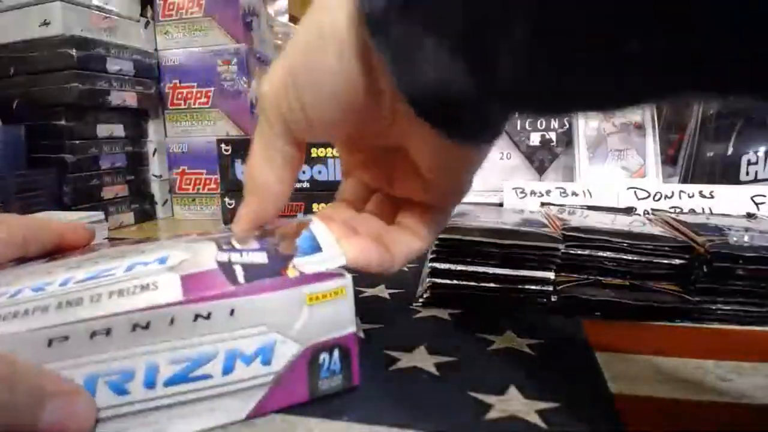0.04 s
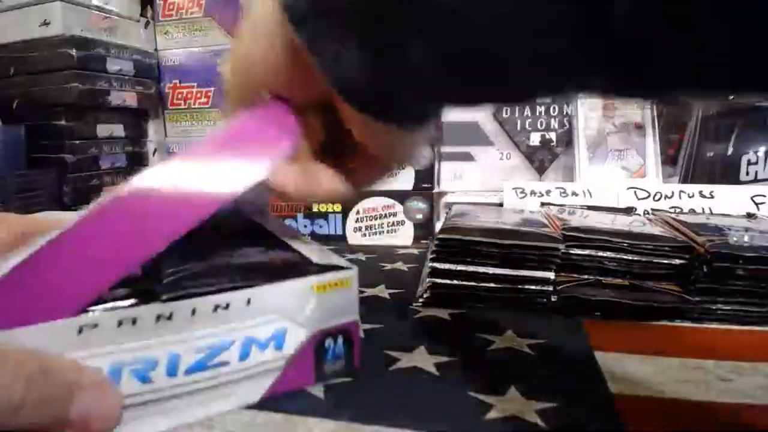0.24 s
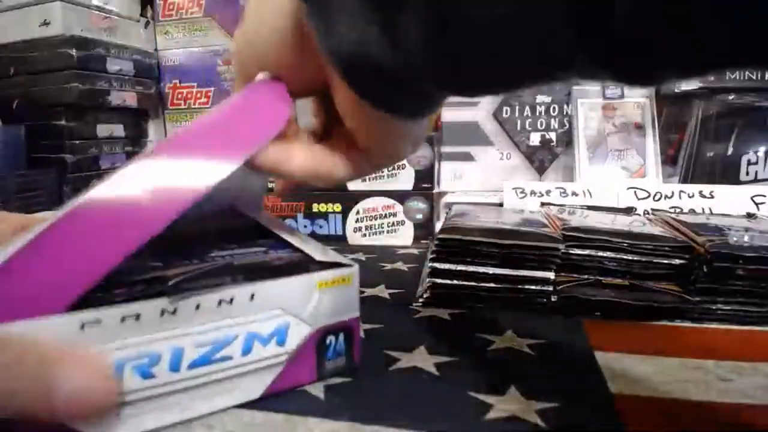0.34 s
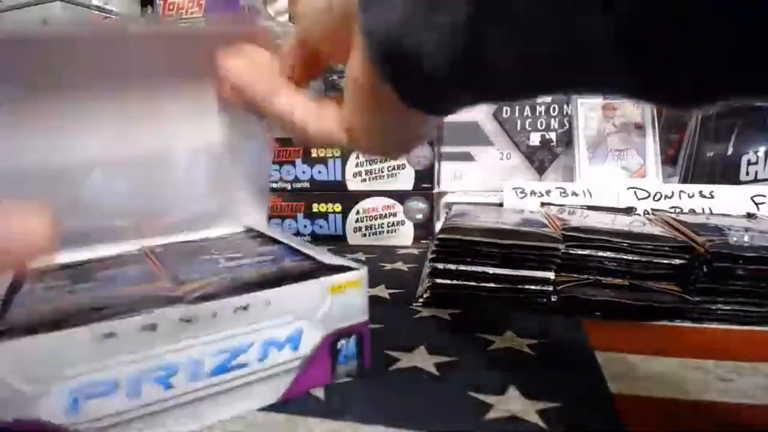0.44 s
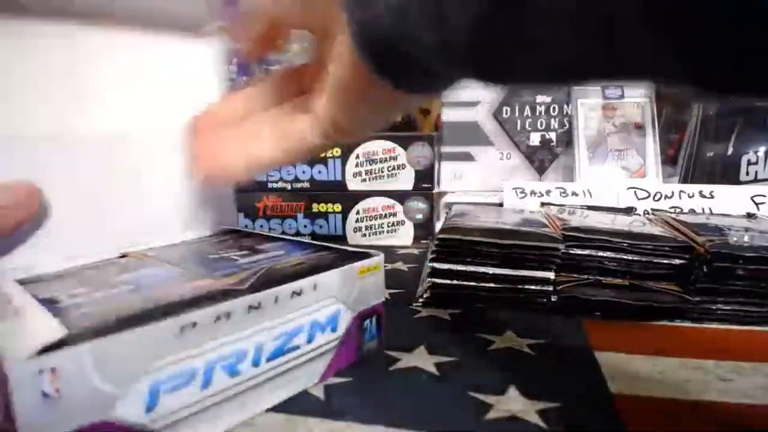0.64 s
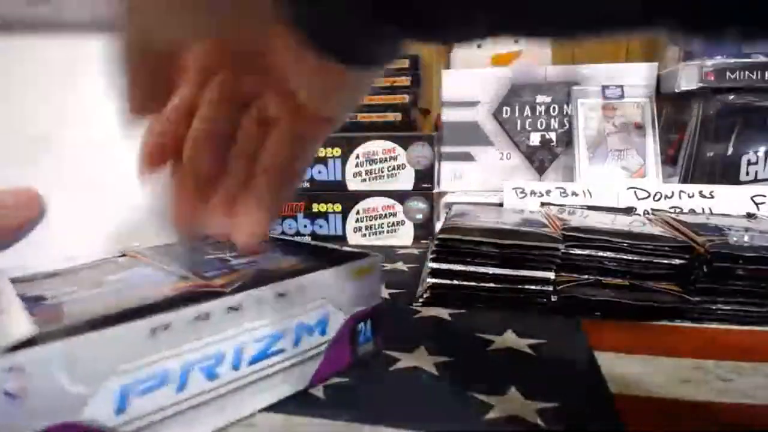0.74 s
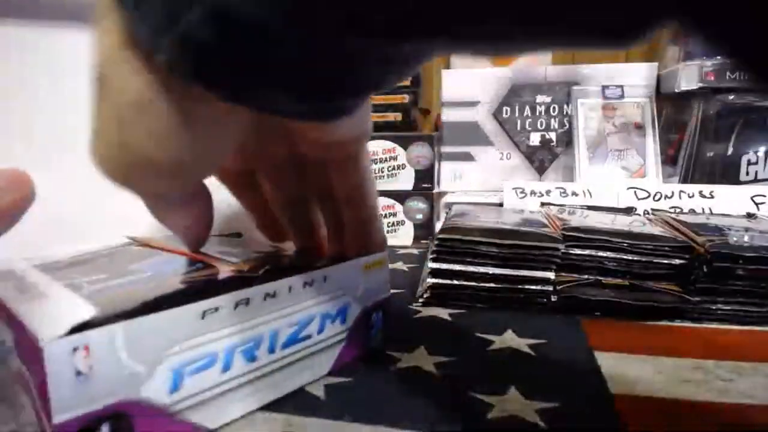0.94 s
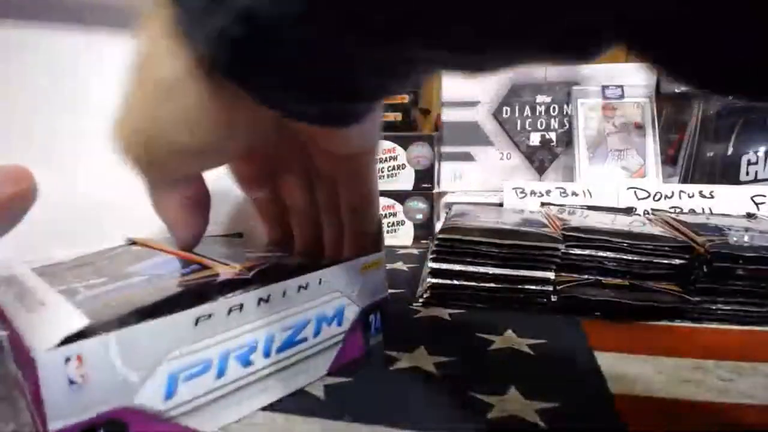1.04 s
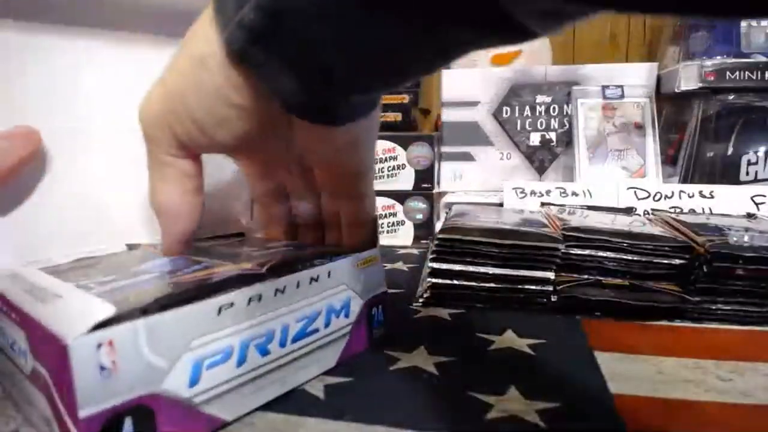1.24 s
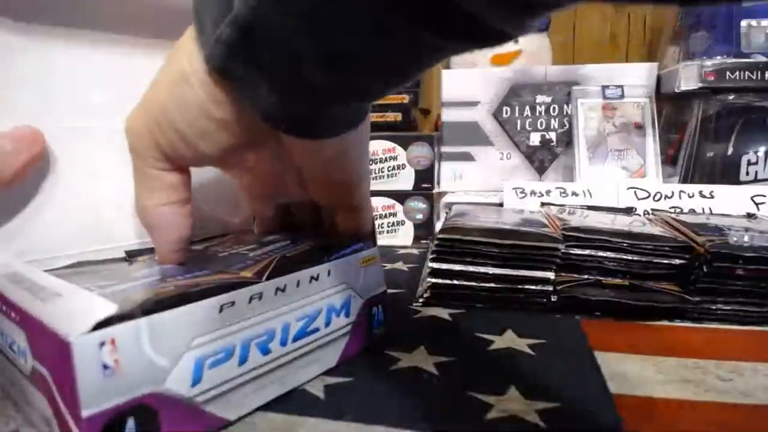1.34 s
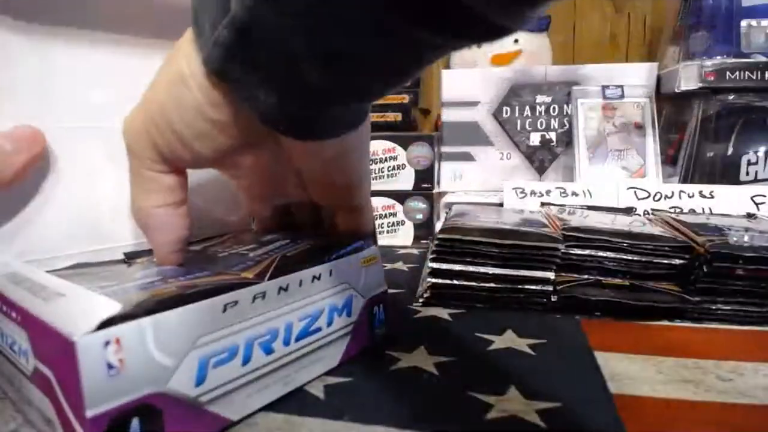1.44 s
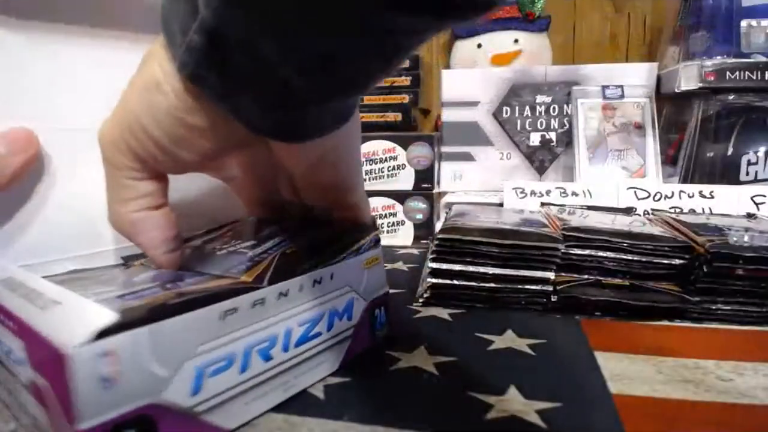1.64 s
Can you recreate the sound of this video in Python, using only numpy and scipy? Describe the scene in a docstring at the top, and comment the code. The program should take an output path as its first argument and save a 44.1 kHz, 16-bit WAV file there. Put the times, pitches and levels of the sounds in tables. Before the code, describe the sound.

A cardboard box is torn open close to the microphone in a small, dry room. The lid creaks, rips and slaps back, then fingers shuffle the foil packs inside with clicks and scrapes.

```python
"""A cardboard box is torn open on a table, close to the microphone in a small, dry room.
First the strained lid creaks. At 0.2 s it rips along its perforation and snaps free, then it
slaps back at 0.46 s and the box bumps on the table. From 0.8 s fingers flick and knock the foil
packs inside, which click, squeak and slide against each other and the card walls.
At 1.3 s one pack chatters as it is wedged in, and a few more scrapes end the scene."""
import sys
import numpy as np
from scipy import signal
from scipy.fft import rfft, irfft
from scipy.io import wavfile
from scipy.ndimage import uniform_filter1d

SR = 44100
rng = np.random.default_rng(int(sys.argv[2]) if len(sys.argv) > 2 else 0)


def master_out(mix):
    """Clip the mix to full scale and print it as 16-bit PCM to the path in sys.argv[1]."""
    frames = np.transpose(np.atleast_2d(mix))
    ceiling = np.clip(frames, -1, 1)
    pcm = np.round(ceiling * 32767).astype(np.int16)
    wavfile.write(sys.argv[1], SR, pcm)


N = 74970
T = np.arange(N) / SR


def amp(db):
    """Turn decibels into a gain."""
    return 10 ** (np.asarray(db) / 20)


def unit(x):
    """Scale to an average strength (rms) of 1."""
    return x / np.sqrt(np.mean(x ** 2) + 1e-20)


def colour(x, points):
    """Shape the tone along a curve of (f/Hz, level/dB) points; white noise keeps its power."""
    hz, db = np.array(points).T
    size = 2 * N
    curve_db = np.interp(np.log(np.fft.rfftfreq(size, 1 / SR) + 1), np.log(hz), db)
    cepstrum = irfft(np.log(unit(amp(curve_db))))
    # fold the filter so that it never sounds ahead of a click
    cepstrum[1:N] *= 2
    cepstrum[N + 1:] = 0
    return irfft(rfft(x, size) * np.exp(rfft(cepstrum)))[:N]


def cut(x, hz, kind, order=2):
    """Keep the "low" or the "high" side of a frequency."""
    return signal.sosfilt(signal.butter(order, min(hz, SR / 2 - 1), kind, fs=SR, output="sos"), x + 1e-18)


def late(x, start_s):
    """The same sound, starting later."""
    return np.concatenate([np.zeros(max(int(start_s * SR), 0)), x])[:N]


def grains(per_s, scatter_db):
    """Tiny clicks at random moments and of uneven size."""
    size = amp(scatter_db * np.clip(rng.standard_normal(N), -2, 2)) * rng.choice([-1, 1], N)
    return unit(size * (rng.random(N) < per_s / SR))


def ring(tones):
    """A struck panel rings: tones of alternating sign, each dying by 60 dB in its fade time."""
    return sum((-1) ** k * amp(db) * np.sin(2 * np.pi * hz * T) * np.exp(-np.log(1000) * T / fade_s)
               for k, (hz, db, fade_s) in enumerate(tones))


def burst(points, decay_s):
    """A brief crush of noise with a sharp start."""
    return colour(rng.choice([-1., 1.], N) * np.exp(-T / decay_s), points)


def swell(length_s):
    """One smooth rise and fall."""
    return np.sin(np.pi * np.minimum(T / length_s, 1))


# tone of the background hiss: f/Hz, level/dB
HISS_TONE = [(30, -4.5), (100, 0.5), (400, -2), (1200, -9.5), (4000, -19.5), (10000, -16.5), (15500, -32.5)]

def hiss():
    """A faint, steady noise lies under everything."""
    return amp(-77) * colour(rng.standard_normal(N), HISS_TONE)


# tone of the room's echo: f/Hz, level/dB
ROOM_TONE = [(60, -26.5), (300, -3), (600, 0.5), (1500, -5), (7000, -0.5), (15000, -8.5)]

def room_echo(direct, fade_s=0.16, delay_s=0.006, level_db=-23.5):
    """The nearby walls send back a short, soft echo."""
    reflections = rng.standard_normal(N) * np.exp(-np.log(1000) * T / fade_s)
    tail = late(colour(reflections, ROOM_TONE), delay_s)
    return amp(level_db) * signal.fftconvolve(direct, unit(tail) / np.sqrt(N))[:N]


# the foil crinkles: t/s, length/s, level/dB
CRINKLES = [(0.473, 0.058, -53.5), (0.861, 0.017, -59.5), (1.106, 0.096, -65), (1.363, 0.05, -59),
            (1.432, 0.041, -49)]
# tone of its creases: f/Hz, level/dB
CREASE_TONE = [(2000, -16), (6000, -3), (7800, -1.5), (9500, 3), (11000, -6), (12500, -11), (15500, -19)]

def foil_crinkles():
    """Thin foil gives under the fingers in swells of tiny, bright creases."""
    out = np.zeros(N)
    for start, length, db in CRINKLES:
        creases = grains(per_s=4700, scatter_db=5) * swell(length)
        out += late(amp(db) * colour(creases, CREASE_TONE), start)
    return out


# the foil squeaks: t/s, length/s, f/Hz, level/dB
SQUEAKS = [(1.014, .016, 4750, -53), (1.04, .055, 3300, -56), (1.07, .04, 4450, -56)]

def foil_squeaks(wander=0.035):
    """Foil rubbing on foil sings briefly at an unsteady pitch."""
    out = np.zeros(N)
    for start, length, hz, db in SQUEAKS:
        wobble = unit(cut(rng.standard_normal(N), 600, "low"))
        phase = 2 * np.pi * np.cumsum(hz * (1 + wander * wobble)) / SR
        out += late(amp(db) * np.sin(phase) * swell(length), start)
    return out


# a card edge drags: t/s, length/s, first f/Hz, last f/Hz, width/Hz, level/dB
DRAGS = [(.512, 0.0079, 1553, 1450, 200, -30.5), (1.504, 0.092, 1185, 1689, 376, -47.5),
         (1.51, 0.055, 699, 898, 353, -47), (1.668, 0.051, 1737, 2170, 450, -51),
         (1.687, .026, 860, 900, 252, -48.5)]

def card_drags():
    """Rubbing makes a narrow band of noise whose pitch glides as the card moves."""
    out = np.zeros(N)
    for start, length, from_hz, to_hz, width_hz, db in DRAGS:
        pitch = from_hz + (to_hz - from_hz) * np.minimum(T / length, 1)
        phase = 2 * np.pi * np.cumsum(pitch) / SR
        rough = [unit(cut(rng.standard_normal(N), width_hz / 2, "low", order=3)) for _ in range(2)]
        band = rough[0] * np.cos(phase) + rough[1] * np.sin(phase)
        out += late(amp(db) * band * swell(length), start)
    return out


# ringing of the tight pack: f/Hz, level/dB, fade/s
PACK_RING = [(976, -5, 0.017), (1184, 3, 0.031), (1504, -2, 0.023), (2150, -4, 0.013), (2610, -14.5, 0.013),
             (3450, -3.5, 0.015), (4280, -6, 0.011), (5410, -9, 0.022), (6100, -19, 0.011),
             (6980, -11.5, .013)]

def wedged_pack(start_s=1.302, length_s=0.033, edge_s=0.0035, level_db=-30):
    """Fast, uneven slips make one pack chatter as it is wedged in."""
    press = np.clip(np.minimum(T, length_s + edge_s - T) / edge_s, 0, 1)
    stall = 1 - np.exp(-((T - 0.012) / 0.0022) ** 2)  # it sticks once, 12 ms in
    slips = grains(per_s=2500, scatter_db=1.5) * press * stall
    pack = unit(cut(ring(PACK_RING), PACK_RING[0][0], "high")) / np.sqrt(N)
    return late(amp(level_db) * signal.fftconvolve(slips, pack)[:N], start_s)


# card and packs slide: t/s, length/s, rise/s, fall/s, hum level/dB, low f/Hz, high f/Hz, scratch level/dB
SLIDES = [(0.141, 0.053, .004, 0.015, -57.5, 590, 1230, -89),
          (0.27, 0.25, 0.0091, 0.025, -53.5, 867, 2120, -65.5),
          (0.278, 0.034, 0.0046, 0.038, -55.5, 173.7, 450, -81),
          (0.384, 0.036, 0.024, 0.013, -58, 152, 586, -78),
          (0.34, 0.059, 0.014, 0.01, -48, 1150, 2000, -62),
          (0.399, 0.085, 0.02, 0.0045, -36.5, 1150, 1950, -51),
          (0.425, 0.046, 0.062, 0.0039, -35, 300, 2470, -38.5),
          (0.469, 0.026, 0.0028, 0.022, -46.5, 397, 1390, -53),
          (0.506, 0.012, 0.0032, 0.0024, -41.5, 510, 1660, -46.5),
          (0.517, 0.082, .005, 0.025, -59, 398, 2290, -64),
          (0.668, 0.046, 0.0047, 0.028, -59, 343.5, 1300, -69.5),
          (.727, 0.0088, 0.0036, 0.0035, -59.5, 1253, 1500, -80),
          (0.912, 0.044, 0.043, 0.0069, -50, 397, 1350, -53.5),
          (0.921, 0.054, 0.025, 0.012, -53.5, 160, 496, -86),
          (0.946, 0.051, 0.0023, 0.0039, -46, 380, 1140, -61),
          (1.001, 0.11, 0.018, 0.028, -50.5, 520, 1390, -57),
          (1.071, 0.046, 0.0088, 0.015, -52.5, 196, 756, -83),
          (1.13, 0.026, 0.021, 0.0087, -54, 540, 1700, -65),
          (1.164, 0.013, 0.0012, 0.0083, -49.5, 490, 1510, -59.5),
          (1.173, 0.047, 0.012, 0.021, -33, 430, 1250, -58),
          (1.228, 0.013, 0.0032, 0.0093, -39.5, 617, 2000, -62),
          (1.267, 0.013, 0.0059, 0.011, -42.5, 1050, 2120, -62),
          (1.301, 0.036, 0.006, 0.0027, -38.5, 920, 1850, -41.5),
          (1.337, 0.057, 0.0028, 0.0049, -44, 620, 1740, -57.5),
          (1.38, 0.038, 0.013, 0.0051, -37, 550, 1890, -50.5),
          (1.42, 0.046, 0.0071, 0.018, -30.5, 467, 1480, -41),
          (1.496, 0.072, 0.015, 0.025, -46.5, 533, 1314, -69.5),
          (1.608, 0.0052, 0.0022, 0.0083, -50.5, 700, 1400, -86.5),
          (1.663, 0.032, .003, .009, -52.5, 1150, 1700, -75),
          (1.664, 0.03, 0.0053, 0.0092, -65.5, 79.7, 804, -77)]
# comb-like colour the nearby table lends the rubbing: f/Hz, level/dB
HOLLOW_TONE = [(300, 2), (450, -2.5), (560, 4), (660, 2.5), (830, 2), (980, -2.5), (1200, -1), (1330, 0.5),
               (1520, -1), (1800, -1.5), (2150, -3.5), (3000, -4)]
# tone of scratching foil: f/Hz, level/dB
SCRATCH_TONE = [(200, -47), (600, -23), (1800, -2.5), (2600, 3), (3000, 1), (3600, 3.5), (4700, -6),
                (5600, -4), (7100, -8), (7900, -13.5), (9500, -8.5), (11500, -19), (12500, -26.5),
                (15500, -31)]

def slides(judder_db=2, judder_s=0.0032):
    """Surfaces catch and let go in a shaky stream: the card hums, the foil scratches above it."""
    out = np.zeros(N)
    for start, length, rise, fall, hum_db, low_hz, high_hz, scratch_db in SLIDES:
        judder = unit(uniform_filter1d(rng.standard_normal(N), int(judder_s * SR)))
        catches = unit(grains(per_s=4000, scatter_db=4.5) * amp(judder_db * judder))
        hum = cut(colour(catches, HOLLOW_TONE), low_hz, "high", order=4)
        hum = unit(cut(hum, high_hz, "low", order=5))
        scratch = colour(catches, SCRATCH_TONE)
        pressure = np.minimum(T / rise, 1) * np.exp(-np.maximum(T - length, 0) / fall)
        out += late(pressure * (amp(hum_db) * hum + amp(scratch_db) * scratch), start)
    return out


# the packs click and fingers tap them: t/s, level/dB, lowest f/Hz, decay/s
CLICKS = [(.035, -48, 2470, 0.0019), (0.364, -30, 1840, 0.0018), (.511, -33, 695, 0.0036),
          (0.567, -41, 1190, 0.0034), (.587, -38.5, 1180, 0.0042), (.678, -49, 505, 0.0089),
          (0.8017, -35, 1760, 0.0036), (0.815, -50, 1690, 0.014), (0.867, -44.5, 2410, 0.011),
          (0.887, -41, 700, 0.0081), (0.8942, -26, 1100, 0.00081), (.8958, -30.5, 895, 0.0008),
          (.901, -31, 3500, 0.00083), (0.9306, -42, 1800, 0.001), (0.95, -33.5, 1500, 0.00068),
          (0.9894, -30, 1510, 0.0014), (.9926, -26.5, 716, 0.0014), (1.0169, -38, 720, 0.0026),
          (1.1119, -49, 2190, .0015), (1.1614, -34.5, 503, 0.0018), (1.387, -31.5, 700, 0.002),
          (1.4057, -32, 1500, .003), (1.4114, -26.5, 900, .002), (1.4309, -19, 900, 0.00079),
          (1.434, -16.5, 600, 0.00049), (1.4445, -25.5, 700, 0.0014), (1.4498, -19, 800, 0.00044),
          (1.4625, -31, 700, 0.0011), (1.4665, -29, 1000, .0015), (1.4887, -28.5, 1000, 0.00084)]
# tone of buckling foil: f/Hz, level/dB
FOIL_TONE = [(300, 8.5), (1000, 11), (1500, -0.5), (2350, 3.5), (3000, -4.5), (3600, -4.5), (4600, -12.5),
             (6300, -4.5), (7100, -13), (7900, -15), (9800, -11), (12500, -25.5), (15500, -30.5)]

def foil_clicks():
    """Foil buckles in single clicks, and fingertips tap the packs the same way; smaller creases sound thinner."""
    return sum(late(cut(amp(db) * burst(FOIL_TONE, decay_s), low_hz, "high"), start)
               for start, db, low_hz, decay_s in CLICKS)


# a pack is flicked: t/s, level/dB
FLICKS = [(.8012, -39), (.816, -51.5), (0.8678, -58)]
# ringing of its wrapper: f/Hz, level/dB, fade/s
WRAPPER_RING = [(794, -7, 0.047), (1050, -12.5, 0.12), (1906, -0.5, 0.036), (2220, 3, 0.021),
                (2500, 4, 0.022), (3280, -10, 0.043), (7030, -5.5, 0.029)]

def pack_flicks():
    """A finger flicks a pack and its stiff wrapper rings."""
    return sum(late(amp(db) * ring(WRAPPER_RING), start) for start, db in FLICKS)


# low thuds as the lid tears, and as box and hand bump the table: t/s, f/Hz, level/dB, time to peak/s
BUMPS = [(0.199, 202, -39, 0.0029), (0.2096, 760, -24, 0.00037), (.209, 322, -33.5, 0.0023),
         (0.23, 182, -19, 0.0036), (0.236, 440, -14, 0.00083), (0.2456, 290, -20.5, 0.00078),
         (0.256, 202, -27, 0.0023), (0.28, 223, -40.5, 0.0037), (.4695, 270, -15.5, 0.00088),
         (.4865, 560, -31, 0.0018), (0.491, 85, -43, 0.0058), (.511, 671, -27, 0.0021),
         (0.541, 230, -40, 0.003), (0.57, 229, -30.5, 0.0015), (.585, 95, -53, 0.0074),
         (0.676, 474, -42, 0.0028), (0.677, 118.3, -30, 0.0062), (.689, 145.7, -26.5, 0.0073),
         (0.7, 194, -34.5, 0.0018), (.724, 110.4, -45, 0.008), (0.765, 154, -40, 0.011),
         (0.766, 245, -34.5, 0.004), (.794, 162.2, -35, 0.0039), (.864, 276, -53.5, 0.0033)]

def table_bumps():
    """Each soft contact gives a few slow swings, heard as a dull thud."""
    out = np.zeros(N)
    for start, hz, db, peak_s in BUMPS:
        push = T / peak_s * np.exp(1 - T / peak_s)
        out += late(-amp(db) * np.sin(2 * np.pi * hz * T) * push, start)
    return out


# tone of the crack that starts a hit: f/Hz, level/dB
CRACK_TONE = [(100, -30), (500, 11), (1200, 6), (2500, -2), (4200, -15.5), (7000, -13), (8200, -15),
              (10500, -27), (15500, -44)]

def hit(tones, ring_db, crack_db, build_s):
    """A crack, then a short hollow ring that builds as the surface is pushed in."""
    ringing = ring(tones) * (1 - np.exp(-T / build_s))
    return amp(ring_db) * ringing + amp(crack_db) * burst(CRACK_TONE, decay_s=0.0038)


# ringing of the stack of packs: f/Hz, level/dB, fade/s
STACK_RING = [(143, -25, 0.019), (274, -0.5, 0.039), (651, -1.5, 0.027), (1024, -7.5, 0.023),
              (1265, 2, 0.021), (1787, -7.5, 0.022), (2156, -12, 0.023), (2774, -9.5, 0.018),
              (3200, -5, 0.013), (4200, -16, 0.022)]

def finger_knock():
    """Fingers knock on the stack of packs and set it ringing; their quick further contacts sound among the
    clicks."""
    return late(hit(STACK_RING, ring_db=-21, crack_db=-34.5, build_s=0.0016), start_s=0.8942)


# ringing of the box: f/Hz, level/dB, fade/s
BOX_RING = [(113.6, -6, 0.057), (268.5, -0.5, 0.041), (441, -1.5, 0.037), (611, 1.5, 0.027),
            (893, -1.5, 0.017), (1128, 4.5, 0.02), (1512, -8, 0.0358), (2040, -7, 0.024),
            (2443, -3.5, 0.021), (3423, -6.5, 0.015), (3760, -10.5, 0.012), (5710, -14.5, 0.018),
            (6980, -14, 0.021)]

def lid_slap():
    """The lid slaps back and sets the box ringing."""
    return late(hit(BOX_RING, ring_db=-9.5, crack_db=-9, build_s=0.00093), start_s=0.4638)


# the lid slips in jerks: t/s, level/dB, f/Hz, build-up/s
SLIPS = [(0.0686, -42.5, 950, 0.0015), (.077, -27.5, 860, 0.0017), (0.0853, -23, 835, 0.0026),
         (0.094, -29, 990, 0.00026), (0.1034, -28.5, 940, 0.00042), (0.1136, -27.5, 960, 0.00026),
         (.122, -27.5, 810, 0.00069), (0.1254, -28, 693, 0.000092), (.135, -27.5, 965, 0.00024)]
# other tones of the bending lid: f/Hz, level/dB, fade/s
BEND_RING = [(240, -21.5, 0.035), (543, -10.5, 0.032), (1562, -11.5, .018), (1900, -15, 0.013),
             (2494, -9.5, 0.016), (3770, -27, 0.014), (4420, -33.5, .014), (5110, -37.5, .014)]

def lid_creak(fade_s=0.028, shudder_s=0.0048, shudder_db=-22):
    """The strained lid sticks and slips; each slip shudders and rings the card at its own pitch."""
    out = np.zeros(N)
    for start, db, hz, build_s in SLIPS:
        push = amp(shudder_db) * grains(per_s=830, scatter_db=1.8) * np.exp(-T / shudder_s)
        push[0] += 1  # the jerk itself
        card = ring([(hz, 0, fade_s)] + BEND_RING) * (1 - np.exp(-T / build_s))
        out += late(amp(db) * signal.fftconvolve(push, card)[:N], start)
    return cut(out, 5200, "low", order=4)


# loudness of the rip as it runs: t/s, level/dB
RIP_LEVELS = [(0.201, -69), (0.211, -56), (0.219, -51), (0.221, -33.5), (0.227, -41), (0.232, -20.5),
              (.238, -22), (.239, -13), (0.244, -21.5), (0.248, -30.5), (.262, -26.5), (0.267, -39),
              (0.279, -51.5), (.3, -75)]
# tone of snapping fibres: f/Hz, level/dB
FIBRE_TONE = [(50, -35.5), (125, -10), (165, -8.5), (240, -6), (370, -12), (470, -4.5), (525, 2),
              (590, -11.5), (690, -13.5), (790, -4), (1050, 0), (1200, -5), (1380, -7), (1650, -11),
              (2300, -6.5), (3800, -23.5), (4700, -19), (7000, -18.5), (7800, -26), (10000, -24),
              (15500, -39)]

def lid_rip():
    """The perforation gives way as fibres snap in a dense run."""
    times, db = np.array(RIP_LEVELS).T
    effort = amp(np.interp(T, times, db)) * (T > times[0]) * (T < times[-1])
    return colour(grains(per_s=3200, scatter_db=5) * effort, FIBRE_TONE)


# the last tabs snap: t/s, ring level/dB, crack level/dB
SNAPS = [(.2212, -37.5, -31.5), (.2315, -23, -21), (.2345, -35, -18.5), (.2391, -13, -4.5),
         (.2458, -29, -17), (.2572, -29, -25.5), (.261, -30, -27.5)]
# tone of a breaking tab: f/Hz, level/dB
SNAP_TONE = [(100, -12), (600, 3), (1200, 1.5), (3500, -15), (7000, -11), (7700, -30.5), (8600, -19),
             (10000, -14), (15500, -26.5)]
# ringing of the freed lid: f/Hz, level/dB, fade/s
LID_RING = [(140, -3, .045), (270, -11, .035), (524, -1, .05), (820, -1, .02), (1050, -3, .03),
            (1384, -9, .06), (1564, -14, .065), (1771, -15, .07), (1961, -12, .07), (2360, -9, .03),
            (4630, -17, .03), (5122, -21, .03), (7000, -20, .03)]

def tab_snaps():
    """Each tab breaks with a crack and rings the lid as it comes free."""
    lid = ring(LID_RING)
    return sum(late(amp(ring_db) * lid + amp(crack_db) * burst(SNAP_TONE, decay_s=0.0015), start)
               for start, ring_db, crack_db in SNAPS)


def scene():
    """The box and its packs, the room's echo and the hiss, in one channel."""
    lid = lid_creak() + lid_rip() + tab_snaps() + lid_slap()
    taps = finger_knock() + pack_flicks() + table_bumps() + foil_clicks()
    rubbing = slides() + card_drags() + foil_squeaks() + foil_crinkles() + wedged_pack()
    direct = lid + taps + rubbing
    return (direct + room_echo(direct) + hiss())[None]


def record(dry, ceiling=1.6, bass_hz=65, top_hz=15900):
    """The microphone rounds the highest peaks, thins the deep bass and cuts the top treble."""
    rounded = ceiling * np.tanh(dry / ceiling)
    thinned = cut(rounded, bass_hz, "high", order=3)
    return signal.sosfilt(signal.ellip(10, .2, 80, top_hz, fs=SR, output="sos"), thinned)


dry = scene()
out = record(dry)
master_out(out)
```